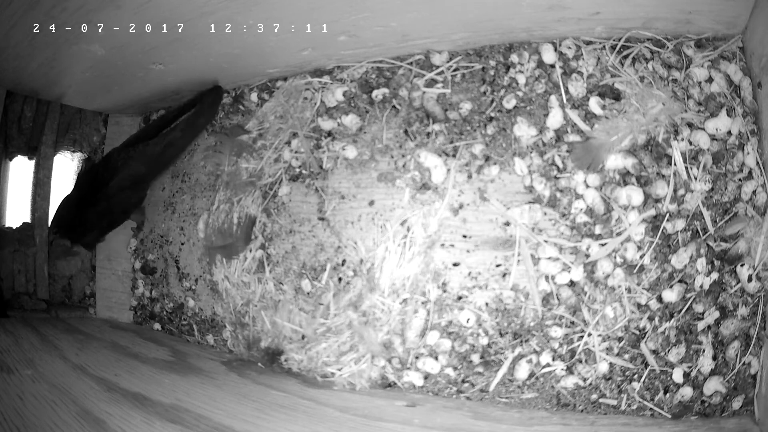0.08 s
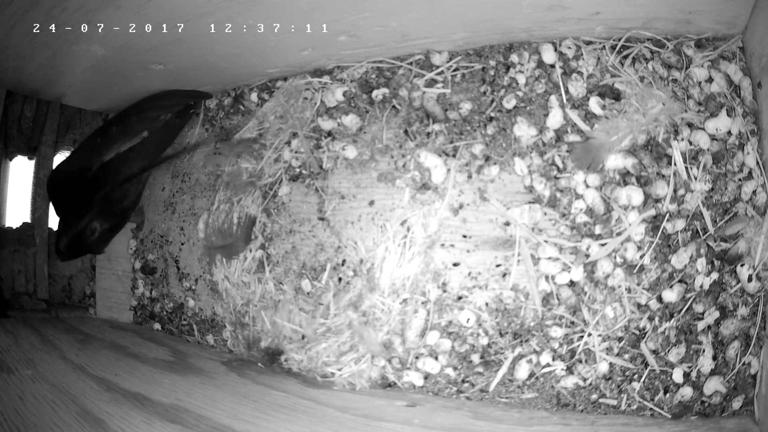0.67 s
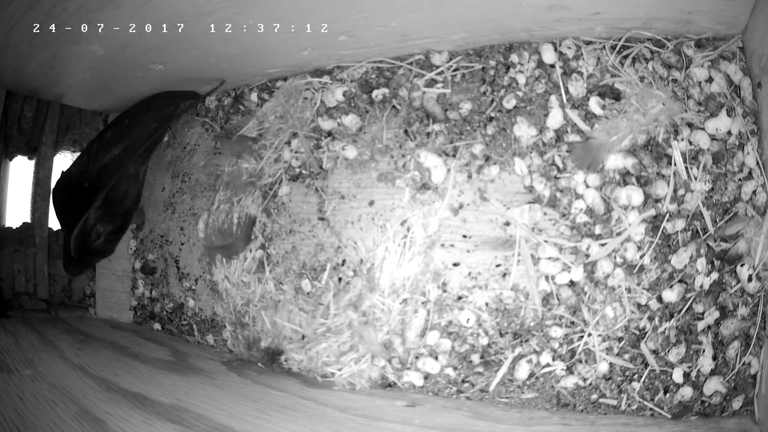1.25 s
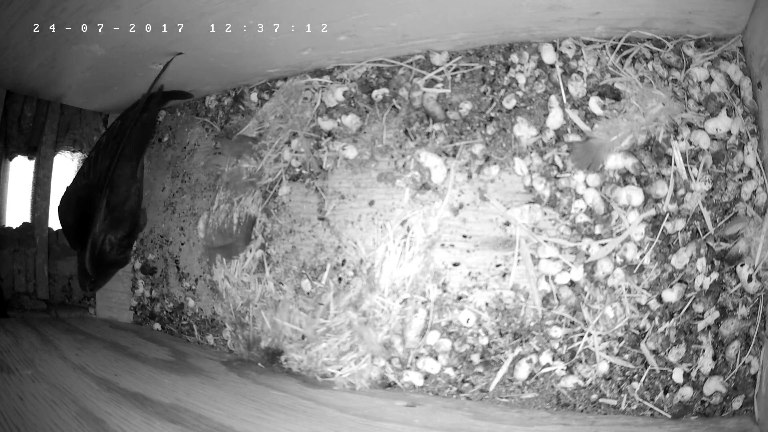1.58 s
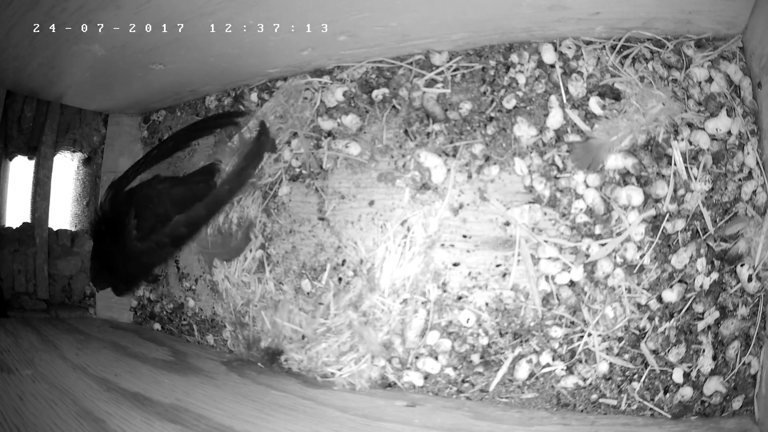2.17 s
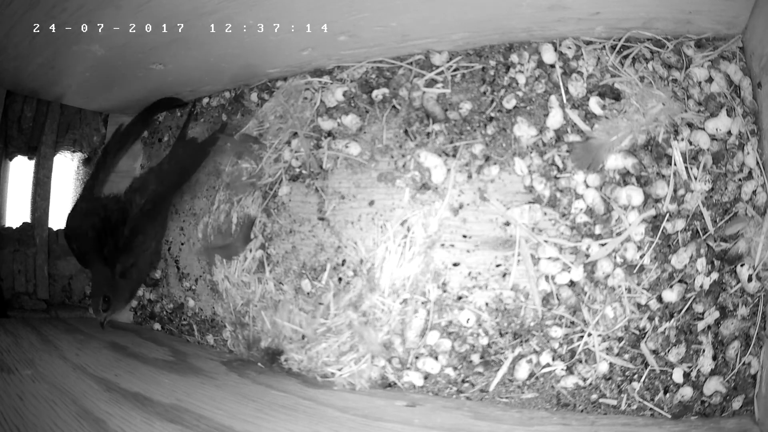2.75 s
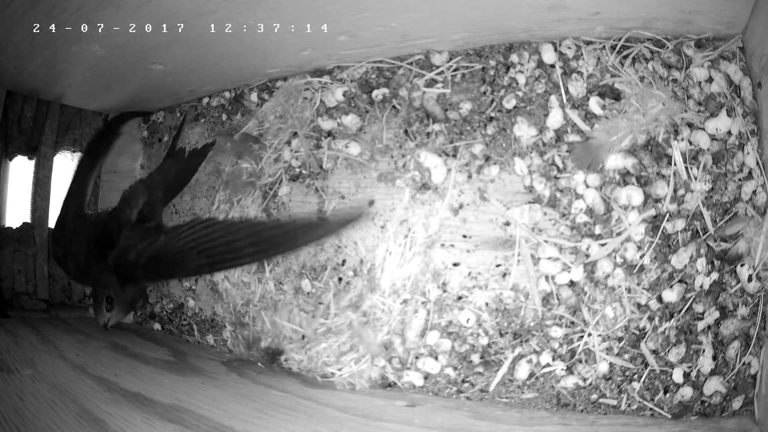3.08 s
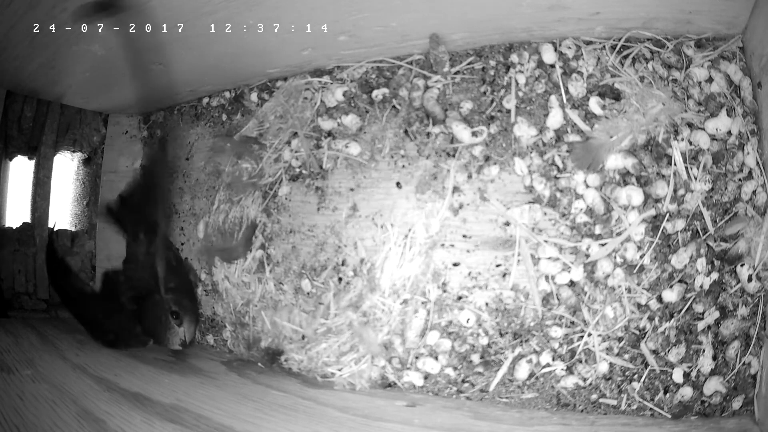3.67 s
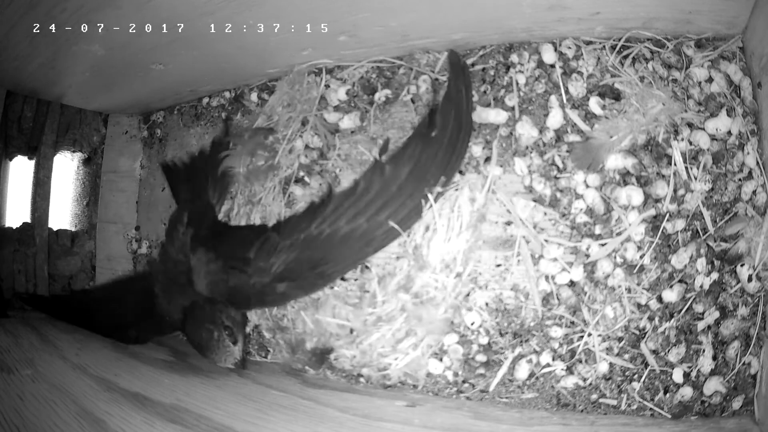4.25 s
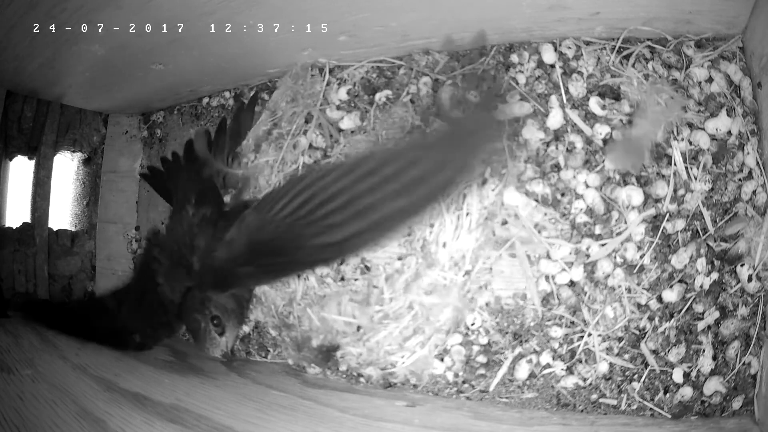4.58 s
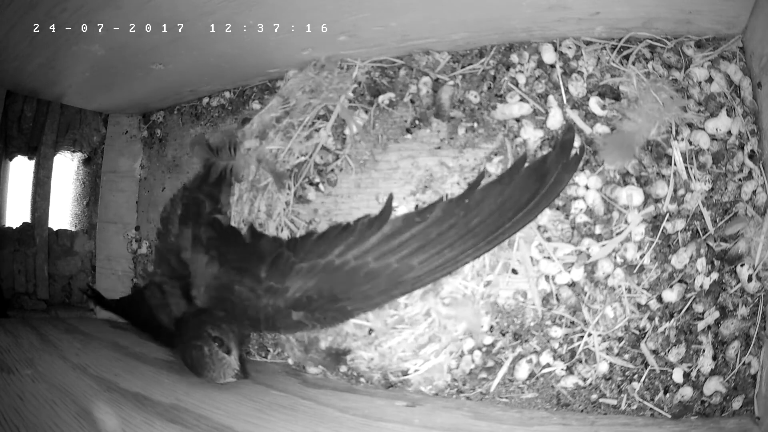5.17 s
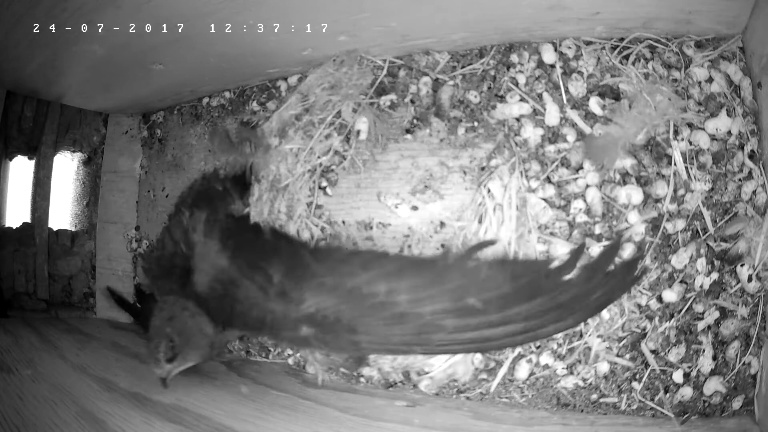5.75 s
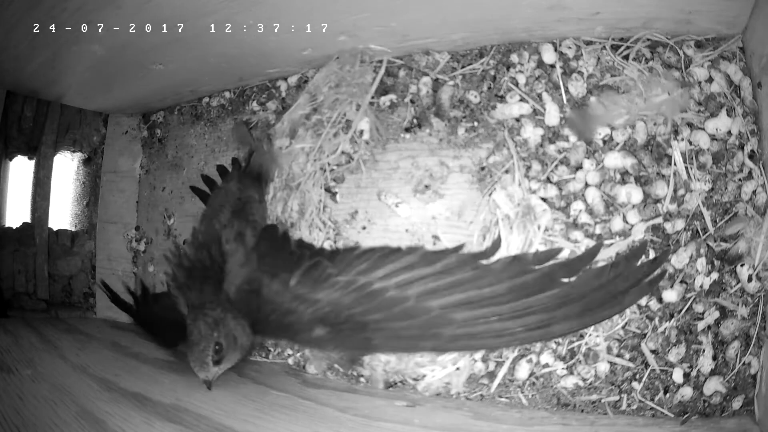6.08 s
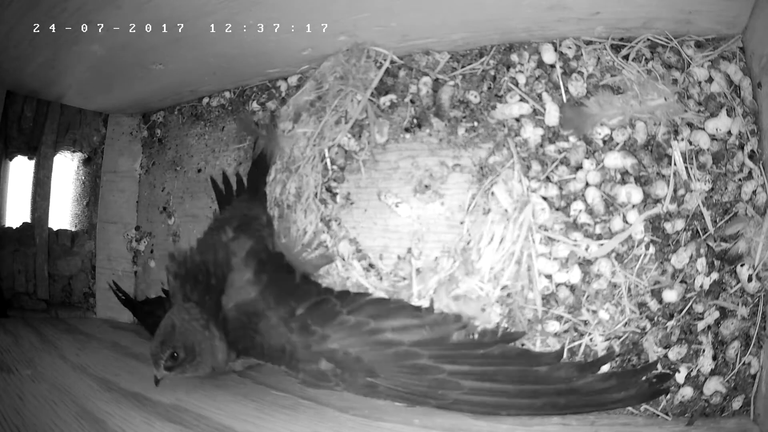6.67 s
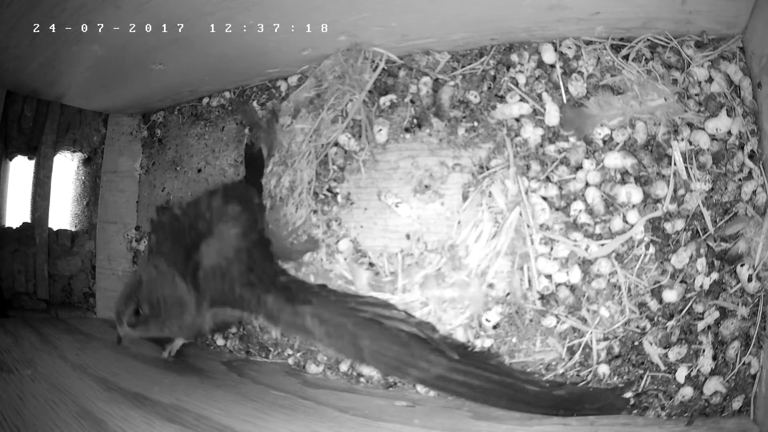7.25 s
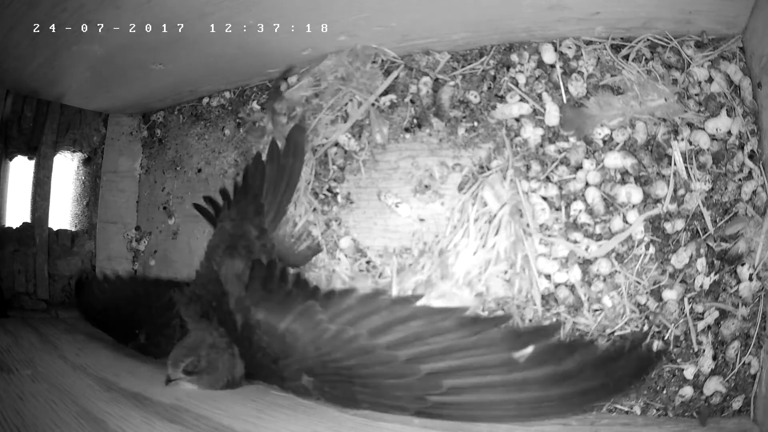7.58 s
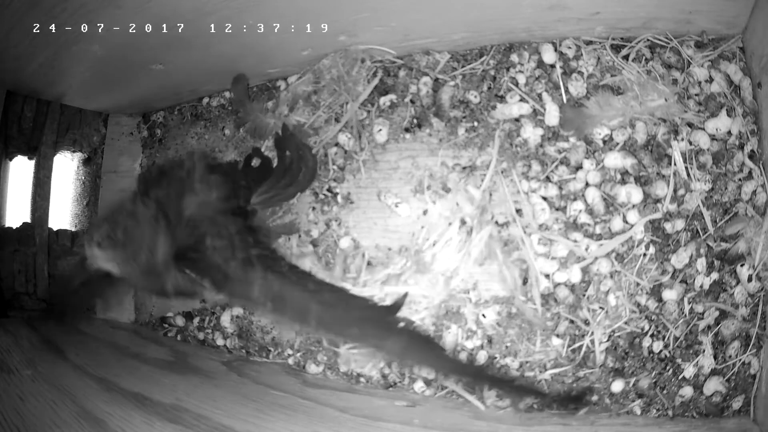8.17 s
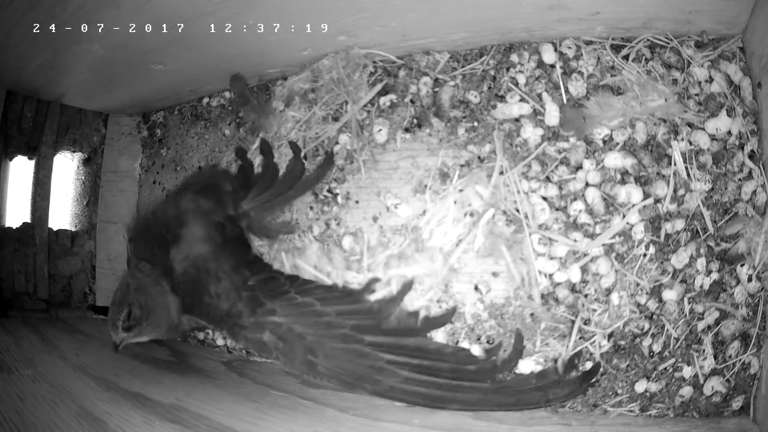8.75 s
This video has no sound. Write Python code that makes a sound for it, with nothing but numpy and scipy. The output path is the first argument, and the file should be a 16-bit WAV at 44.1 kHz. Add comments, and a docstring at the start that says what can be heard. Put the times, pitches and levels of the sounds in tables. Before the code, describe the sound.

Faint engine hum and hiss, then close feather rustling, claw taps and wing beats growing stronger in a small wooden box.

```python
"""A far engine drones outside a wooden nest box and sinks in pitch, under a steady microphone hiss.
After about three seconds a swift stirs inside, close to the small camera microphone, then scrambles
and flaps ever harder. Stiff feathers scrape the walls and the litter, claws tap, the body bumps the
boards, and the box rings with each."""
import sys
import numpy as np
from scipy import signal
from scipy.fft import rfft, irfft, next_fast_len
from scipy.io import wavfile
from scipy.ndimage import uniform_filter1d

SR = 44100
rng = np.random.default_rng(int(sys.argv[2]) if len(sys.argv) > 2 else 0)


def wav_record(signal):
    """Record a signal, one row per channel, as 16-bit PCM in the file named by sys.argv[1]."""
    frames = np.transpose(np.atleast_2d(signal))
    bounded = np.clip(frames, -1, 1)
    # unit amplitude maps onto the largest positive 16-bit level
    quanta = np.round(bounded * 32767).astype(np.int16)
    wavfile.write(sys.argv[1], SR, quanta)


N = 392931
TIME = np.arange(N) / SR

# the clearest strokes of feet and feathers along the wood: t/s, length/s, level/dB
STROKES = [(2.938, 0.025, -40.5), (2.973, 0.016, -40.5), (4.138, 0.022, -35), (4.291, 0.027, -37.5),
           (4.336, 0.0072, -34.5), (4.382, 0.0099, -40.5), (4.514, .022, -36.5), (4.559, 0.046, -40),
           (4.61, 0.028, -32), (4.763, 0.026, -34), (4.795, 0.051, -31.5), (4.858, 0.04, -30.5),
           (4.971, 0.0087, -39), (5.065, 0.025, -34.5), (5.44, 0.0097, -29.5), (5.612, 0.046, -37),
           (5.671, 0.03, -30.5), (5.719, 0.019, -33), (5.794, 0.0091, -35), (5.814, 0.011, -35),
           (5.862, 0.01, -34.5), (5.907, 0.031, -39.5), (5.942, 0.019, -29.5), (6.017, 0.0096, -30),
           (6.048, 0.017, -30), (6.149, 0.037, -34.5), (6.194, 0.013, -25.5), (6.225, 0.017, -34),
           (6.305, 0.032, -31.5), (6.357, .018, -28), (6.393, 0.017, -27.5), (6.537, 0.014, -22.5),
           (6.618, .021, -26), (6.688, 0.022, -31), (6.818, 0.086, -29.5), (6.967, 0.019, -26),
           (6.996, 0.018, -19.5), (7.069, 0.033, -22.5), (7.131, 0.015, -23), (7.177, .017, -23),
           (7.246, 0.012, -30), (7.369, .018, -23), (7.554, 0.023, -28.5), (7.941, .01, -30.5),
           (7.972, .016, -29), (8.081, 0.041, -29), (8.176, 0.034, -23), (8.278, 0.033, -28.5),
           (8.744, 0.0088, -26)]
# wing beats, each a push of air and then a hissing sweep of feathers: t/s, length/s, sweep/dB, air/dB
WINGBEATS = [(3.524, .045, -52, -55), (6.505, 0.036, -31.5, -34), (7.052, 0.041, -30, -44),
             (7.434, 0.067, -30.5, -27), (8.161, 0.0075, -21.5, -20.5), (8.584, .036, -26, -21.5),
             (8.647, 0.0086, -19.5, -30), (8.823, 0.03, -27, -21), (8.879, 0.018, -24.5, -34)]
# once the open wings lie on the litter, moves weigh more on the boards and sizzle more
SPREAD_WEIGHT_DB, SPREAD_SIZZLE_DB = 1.5, 5.5


def feathers():
    """Stick-slip friction, right by the microphone, drives the box and shakes its walls."""
    # the walls shake more as the bird works its way along the box: t/s, level/dB
    wall_shake = [(4.8, -15), (6.3, -6)]
    low, mid, high = contact(rise_s=0.0018, fall_s=0.00088, sag_db=3)
    grain = shifting(slips(per_s=1300, spread_db=3.5, smooth=0.41), patchy_db=4.5)
    fine = shifting(slips(per_s=2500, spread_db=0, smooth=0.66), patchy_db=5)
    walls = amp(curve(wall_shake)) * box(low * grain, 22, 221)
    boards = amp(-1.12) * box(low * grain, 235, 1173)
    cavity = amp(0.47) * box(mid * grain, 1135, 2120)
    shafts = amp(-0.46) * box(high * fine * amp(0.67 * wander(60)), 2340, 4240)
    # the finest barbs catch more as the force grows
    catching = (high / amp(-38)) ** 0.042 * amp(1.65 * wander(45))
    barbs = amp(-6.5) * box(high * fine * catching, 4600, 10000)
    return walls + boards + cavity + shafts + barbs


def contact(rise_s, fall_s, sag_db):
    """Each stroke or wing sweep adds its force to the shuffling: a quick rise, a sag, a quick release."""
    power, t = shuffling() ** 2, np.arange(SR // 8) / SR
    moves = []
    for s, length, db in STROKES:
        weight_db = -5 + SPREAD_WEIGHT_DB * spread(s)
        dulling_db = 0.32 * (db + 33)  # a harder stroke bites into the wood and sounds duller
        sizzle_db = -10.5 + SPREAD_SIZZLE_DB * spread(s) - dulling_db
        moves.append((s, length, db, weight_db, sizzle_db))
    moves += [(s, length, db, -1.5, -1.5) for s, length, db, _ in WINGBEATS]
    for s, length, db, weight_db, sizzle_db in moves:
        release = np.exp(-np.maximum(t - length, 0) / fall_s)
        shape = np.minimum(t / rise_s, 1) * amp(-sag_db * t / length) * release
        for band, colour_db in zip(power, (weight_db, 0, sizzle_db)):
            add(band, s, (amp(db + colour_db) * shape) ** 2)
    return np.sqrt(power)


def shuffling():
    """Force of the restless bird in three ranges: boards, cavity, sizzle."""
    # effort of the shuffling: t/s, level/dB
    effort = [(2.8, -70), (2.95, -48), (3.3, -70), (3.56, -55), (3.85, -60.5), (4.25, -51.5), (4.75, -40),
              (4.97, -46.5), (5.12, -45), (5.3, -53), (5.7, -40.5), (6.45, -39), (6.8, -35.5), (6.94, -37),
              (7.04, -28), (7.28, -37.5), (7.48, -34.5), (7.82, -44), (8.45, -34.5), (8.9, -31)]
    level, wings = curve(effort), spread(TIME)
    rub = scratches(per_s=36, decay_s=0.0073, steady=1.57)
    ticks = scratches(per_s=34, decay_s=0.0035, steady=0.27)
    sizzle = scratches(per_s=40, decay_s=0.005, steady=1)
    light = 1 / (1 + amp(level + 43) ** 2)  # a light touch breaks up into separate claw ticks
    give = 1 / np.sqrt(1 + amp(-51.5 - level) ** 2)  # and hardly moves the boards
    low = amp(-1.5 + SPREAD_WEIGHT_DB * wings) * give * rub
    mid = amp(-1.5) * np.sqrt(light * ticks ** 2 + (1 - light) * rub ** 2)
    high = amp(-11 + SPREAD_SIZZLE_DB * wings) * sizzle
    force = (TIME > effort[0][0]) * amp(level + pauses(before_s=0.021, width_s=0.021, dip_db=-0.5))
    return force * np.array([low, mid, high])


def spread(s):
    """How far the wings lie spread on the litter, 0 to 1; they open around 7.18 s."""
    return 0.5 + 0.5 * np.tanh((s - 7.18) / 0.06)


def pauses(before_s, width_s, dip_db):
    """The bird gathers itself just before each stroke or wing beat: a dip in dB."""
    starts = [row[0] for row in STROKES + WINGBEATS]
    t = TIME[::64]
    still = np.exp(-((t[:, None] - starts + before_s) / width_s) ** 2).max(axis=1)
    return dip_db * np.interp(TIME, t, still)


def scratches(per_s, decay_s, steady):
    """Force of loosely spaced small scratches, each with a sharp start, over a steady rub; rms 1."""
    gaps, sizes = rng.random((2, 2 ** 10))
    at = np.cumsum(-np.log(1 - gaps) * SR / per_s).astype(int) + 1
    starts = np.zeros(N)
    starts[at[at < N]] = 0.5 + sizes[at < N]
    decays = signal.lfilter([1], [1, -np.exp(-1 / (decay_s * SR))], starts)
    return unit_rms(unit_rms(decays) + steady)


def slips(per_s, spread_db, smooth):
    """Barbs catch and let go: random clicks over a finer rub."""
    at = np.flatnonzero(rng.random(N) < per_s / SR)
    sizes = amp(spread_db * np.minimum(rng.standard_exponential(N)[at], 3))
    clicks = np.zeros(N)
    clicks[at] = sizes * np.sign(rng.random(N)[at] - 0.5)
    return unit_rms(unit_rms(clicks) + smooth * rng.standard_normal(N))


def shifting(x, patchy_db, size=512):
    """The point of contact moves, so each scratch favours other pitches."""
    spectra = signal.stft(x, nperseg=size)[2]
    patches = unit_rms(blur(rng.standard_normal(spectra.shape), bins=3, frames=5))
    spectra *= amp(patchy_db * np.clip(patches, -2, 2))
    broad_power = blur(abs(spectra) ** 2, bins=15, frames=3)
    spectra /= np.sqrt(abs(broad_power) + 1e-12)  # colour changes, force stays
    return unit_rms(signal.istft(spectra, nperseg=size)[1][:N])


def wing_drag():
    """A wing tip drags along the wall: a hollow rub in one narrow range of the box's resonances."""
    # force of the drag: t/s, level/dB
    drag = [(8.33, -50), (8.41, -34), (8.5, -36.5), (8.57, -53), (8.66, -54), (8.69, -29), (8.78, -45)]
    force = amp(curve(drag)) * (TIME > drag[0][0]) * (TIME < drag[-1][0])
    return box(force * rng.standard_normal(N), 990, 1000)


def claws():
    """A claw taps: a short note of the board, and a tick that rings through the box."""
    # taps: t/s, level/dB, f/Hz, ring time constant/s
    taps = [(3.0373, -25, 1330, 0.00076), (3.591, -30, 1670, 0.0025), (4.146, -28, 1300, 0.0029),
            (4.528, -19.5, 1525, 0.0048), (4.6112, -12.5, 1492, 0.0034), (4.7645, -21, 1467, 0.0041),
            (5.442, -24.5, 1256, 0.012), (5.9113, -17.5, 1790, 0.0019), (6.1447, -14.5, 1420, 0.0014),
            (7.9471, -20.5, 1670, 0.002), (8.652, -14, 1830, 0.0018)]
    return amp(-3.5) * struck(taps, rise_s=0.00097) + amp(10) * box(blows(taps), 400, 3900)


def bumps():
    """Soft wing and body hit the boards: a low note and a hollow knock. Feathers rubbing along a wall set it
    groaning in a longer note near 297 Hz."""
    # bumps, and the groans near 297 Hz of feathers rubbing a wall: t/s, level/dB, f/Hz, ring time constant/s
    thuds = [(4.578, -29.5, 156, 0.044), (6.487, -19, 142, 0.017), (6.992, -19.5, 156, 0.015),
             (7.184, -13.5, 181, 0.011), (7.350, -14.5, 144.5, .011), (7.434, -12.5, 153, 0.007),
             (7.456, -17.5, 132, 0.012), (8.094, -26.5, 298, 0.025), (8.161, -13, 129, 0.0095),
             (8.19, -16.5, 138, 0.011), (8.272, -23.5, 143, 0.016), (8.593, -15, 120, 0.014),
             (8.643, -16, 143, 0.025), (8.684, -19, 296, 0.037), (8.843, -18, 140, 0.0069),
             (8.879, -11.5, 152, 0.016)]
    return struck(thuds, rise_s=0.0023) + amp(9.5) * box(blows(thuds), 290, 640)


def struck(rows, rise_s):
    """Each blow rings one damped note."""
    out, t = np.zeros(N), np.arange(SR // 4) / SR
    for s, db, hz, decay_s in rows:
        attack = 1 - np.exp(-(t / rise_s) ** 2)
        note = np.sin(2 * np.pi * hz * t) * attack * np.exp(-t / decay_s)
        add(out, s, amp(db) * note / abs(note).max())
    return out


def blows(rows):
    """One impulse a blow."""
    out = np.zeros(N)
    for s, db, _, _ in rows:
        add(out, s, amp([db]))
    return out


def wing_air(lead_s=0.02, hz=46):
    """Each beat pushes and pulls the air at the microphone, starting just ahead of its sweep."""
    out, t = np.zeros(N), np.arange(0, 0.045, 1 / SR)
    puff = np.hanning(len(t)) * np.sin(2 * np.pi * hz * t)
    for s, _, _, db in WINGBEATS:
        add(out, s - lead_s, amp(db) * puff)
    return out


def box(x, lo_hz, hi_hz, size=8192):
    """Rings x through one frequency range of the wooden box, heard from inside."""
    # resonances of the box: f/Hz, width/Hz, level/dB
    modes = [(136, 43, -4.5), (313.7, 26.7, -3.5), (470, 22, -10.5), (560.7, 57, -6), (683.3, 47, -4),
             (762.5, 19, -3.5), (842, 18, -11.5), (954.4, 38, -6), (1019, 30, -6), (1214, 28, 0.5),
             (1276, 116, -6), (1521, 104, -1), (1626, 120, -6), (1898, 62, -4), (2218, 120, -10),
             (2423, 110, -11.5), (2634, 73, -10), (2863, 110, -20), (3030, 120, -13.5), (3363, 160, -15),
             (3700, 150, -12), (5140, 54, -29), (5910, 410, -18.5)]
    # its response between the resonances: f/Hz, level/dB
    base = [(25, -16), (60, -7.5), (200, -15), (350, -8.5), (420, -19), (880, -27), (1120, -20.5),
            (1400, -21.5), (2050, -18), (2850, -19.5), (3600, -19), (4500, -23.5), (6800, -21.5),
            (7600, -32)]
    hz = np.fft.rfftfreq(size, 1 / SR) + 1
    peaks = sum(amp(db) ** 2 / (1 + ((hz - f) / (0.77 * width)) ** 2) ** 2 for f, width, db in modes)
    power = amp(spectrum_at(base, hz)) ** 2 + peaks
    power = power / (1 + (lo_hz / hz) ** 16) / (1 + (hz / hi_hz) ** 16)
    log_gain = np.log(power + 1e-9) / 2
    # minimum phase: the ring follows the blow
    response = np.exp(np.conj(signal.hilbert(np.r_[log_gain, log_gain[-2:0:-1]])))
    ring = np.fft.ifft(response).real[:size // 2]
    return signal.oaconvolve(x, ring / np.linalg.norm(ring))[:N]


def engine(start_hz=81.9, sag_hz_per_s=1.52):
    """Far off outside, an engine slows steadily: wavering low orders over a rumble."""
    # its second order, which fades in swells: t/s, level/dB
    hum = [(0, -32), (.62, -37.5), (.95, -34), (1.35, -53), (1.78, -38.5), (1.97, -56.5), (2.3, -48.5),
           (2.65, -60), (8.9, -59.5)]
    # its third order: t/s, level/dB
    overtone = [(0, -51), (.3, -52), (.6, -74), (1.4, -55.5), (1.8, -61.5), (4.6, -61.5), (5.4, -50.5),
                (6, -54)]
    # spectrum of the rumble: f/Hz, level/dB
    rumble_spectrum = [(20, -27), (31, -7), (48, -18), (85, -6), (125, -3), (155, 4), (190, -8.5),
                       (270, -20.5), (400, -31), (1200, -47.5)]
    # rise and fall of the rumble: t/s, level/dB
    rumble_level = [(0, -43.5), (1, -42.5), (1.8, -50), (4.6, -48.5), (5.35, -42.5), (8.9, -42.5)]
    hz = (start_hz - sag_hz_per_s * TIME) * (1 + 0.0024 * wander(13))
    angle = 2 * np.pi * np.cumsum(hz) / SR
    orders = np.sin(2 * angle) + amp(-28) * np.sin(angle) + amp(-32.5) * np.sin(4 * angle)
    drone = amp(curve(hum) + 1.1 * wander(8.7)) * orders
    third = amp(curve(overtone) + 2.3 * wander(10)) * np.sin(3 * angle)
    rumble = amp(curve(rumble_level) - 1) * noise(rumble_spectrum)
    return np.sqrt(2) * (drone + third) + rumble


def faint_tone():
    """A faint tone outside wavers and comes and goes."""
    hz = 492 + 10 * wander(1.6) + 6 * wander(90)
    return amp(-67 + 4.5 * wander(10)) * np.sin(2 * np.pi * np.cumsum(hz) / SR)


def hiss():
    """Steady microphone hiss over the outdoor air."""
    # spectrum of the noise floor: f/Hz, level/dB
    floor = [(20, 11.5), (500, 10.5), (600, 7), (720, 7), (800, 11), (950, 5.5), (1600, 3.5), (3500, 0),
             (7000, -1), (7600, -7.5)]
    return amp(-57) * noise(floor)


def noise(points):
    """Steady noise of a given spectrum, rms 1."""
    size = next_fast_len(N)
    gain = amp(spectrum_at(points, np.fft.rfftfreq(size, 1 / SR)))
    return unit_rms(irfft(rfft(rng.standard_normal(size)) * gain, size)[:N])


def wander(rate):
    """Random drift of about rms 1, turning `rate` times a second."""
    steps = rng.standard_normal(2 ** 12)
    return np.interp(TIME * rate, np.arange(len(steps)), steps) * np.sqrt(3 / 2)


def blur(grid, bins, frames):
    """Averages over neighbouring frequencies, then over time."""
    return uniform_filter1d(uniform_filter1d(grid, bins, axis=0), frames, axis=1)


def curve(points):
    """Reads a level curve at every sample."""
    return np.interp(TIME, *np.transpose(points))


def spectrum_at(points, hz):
    """Reads a spectrum on a log-frequency axis."""
    f, db = np.transpose(points)
    return np.interp(np.log(hz + 1), np.log(f + 1), db)


def amp(db):
    """Decibels to gain."""
    return 10 ** (np.asarray(db) / 20)


def unit_rms(x):
    """Scales to rms 1."""
    return x / np.sqrt(np.mean(x ** 2) + 1e-20)


def add(mix, s, sound):
    """Mixes a sound in at time s."""
    part = mix[max(round(s * SR), 0):][:len(sound)]
    part += sound[:len(part)]


def scene():
    """One microphone in the box: the bird up close, the drone far outside, the hiss."""
    bird = feathers() + wing_drag() + claws() + bumps() + wing_air()
    return (bird + engine() + faint_tone() + hiss())[None]


def record(dry, edge_hz=7560, converter_hz=16000, top_hz=8872):
    """The camera's narrow sound band; its slow converter mirrors a trace of the top treble upward."""
    band = signal.firwin(601, edge_hz, window=("kaiser", 8), fs=SR)
    narrow = signal.oaconvolve(dry, band[None], "same", axes=1)
    mirror = narrow * 2 * np.cos(2 * np.pi * converter_hz * TIME)
    lowpass = signal.firwin(301, top_hz, window=("kaiser", 8), fs=SR)
    return signal.oaconvolve(narrow + amp(-19.5) * mirror, lowpass[None], "same", axes=1)


dry = scene()
out = record(dry)
wav_record(out)
```